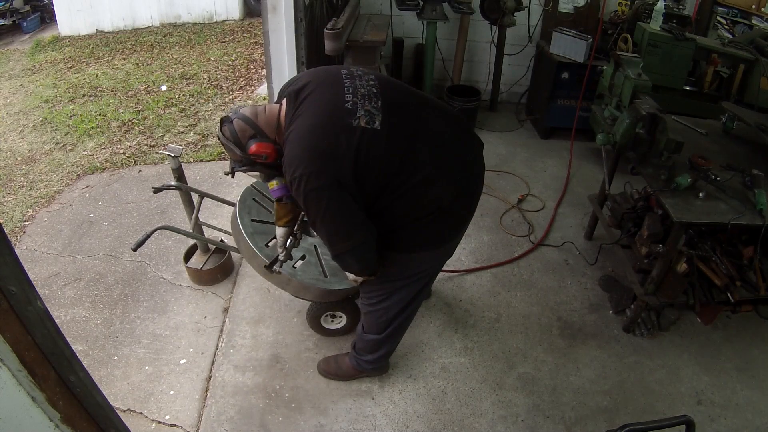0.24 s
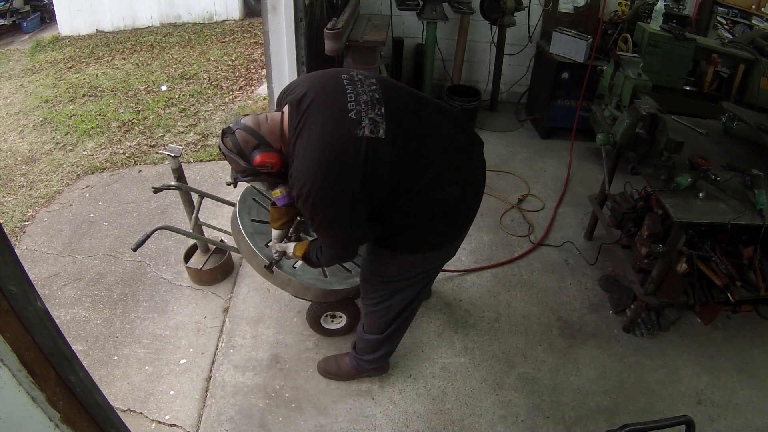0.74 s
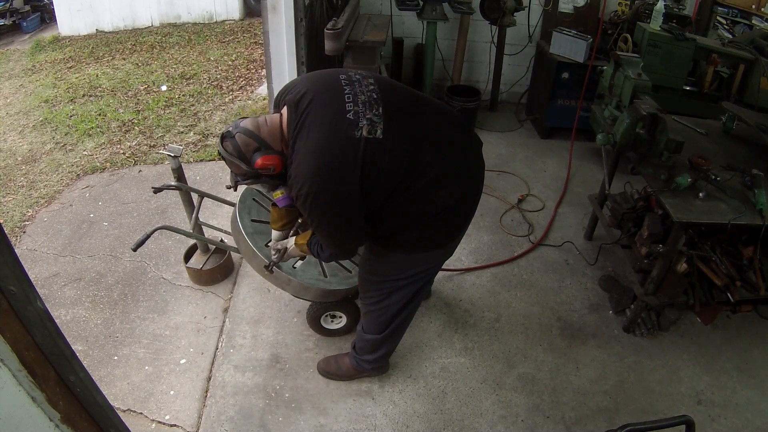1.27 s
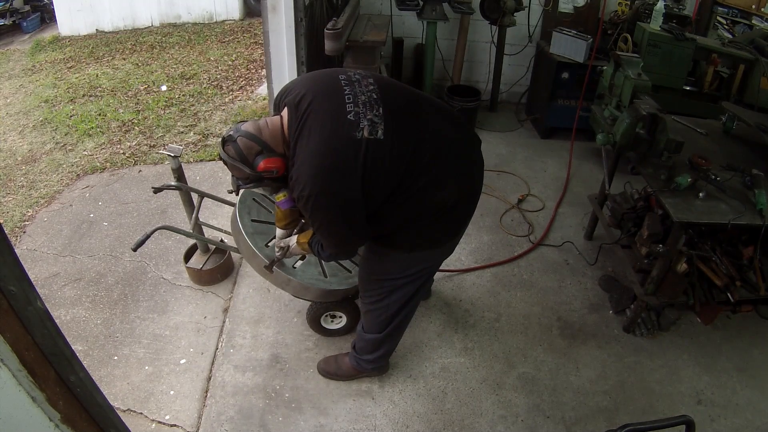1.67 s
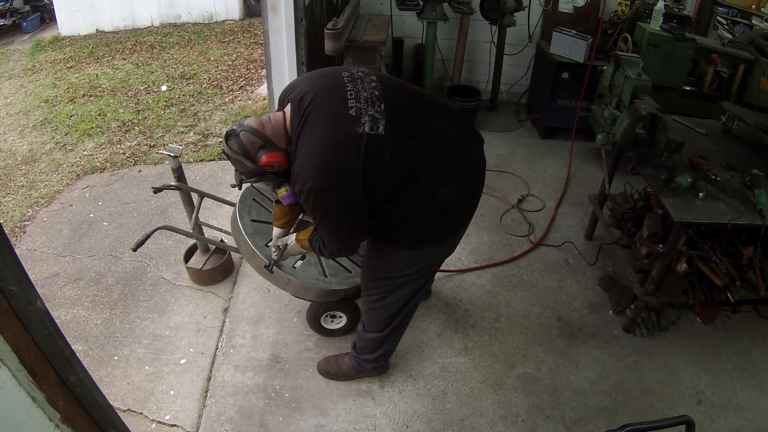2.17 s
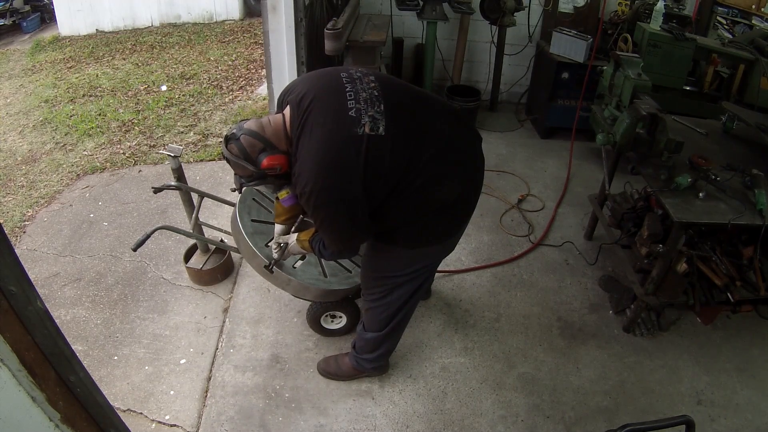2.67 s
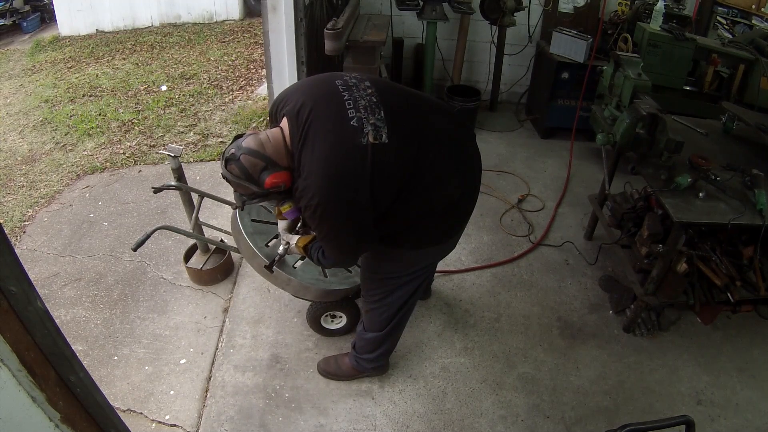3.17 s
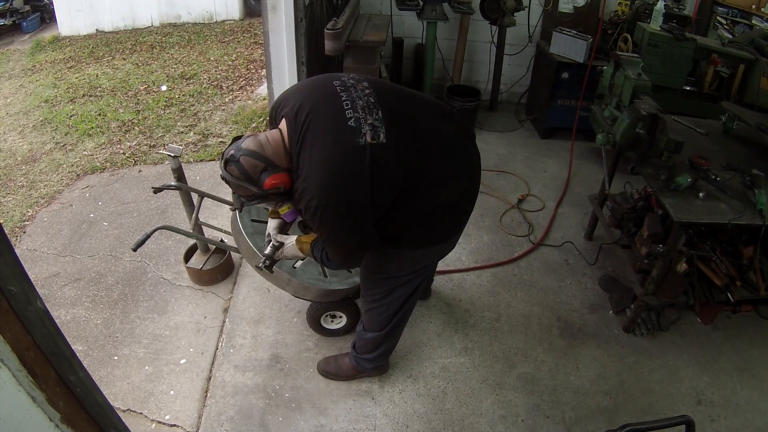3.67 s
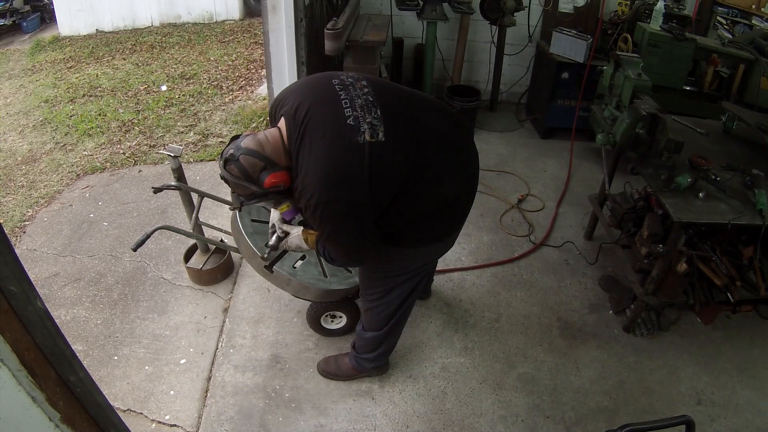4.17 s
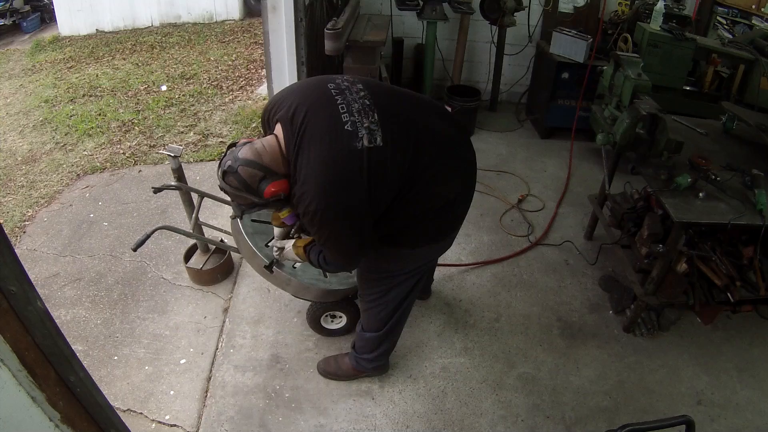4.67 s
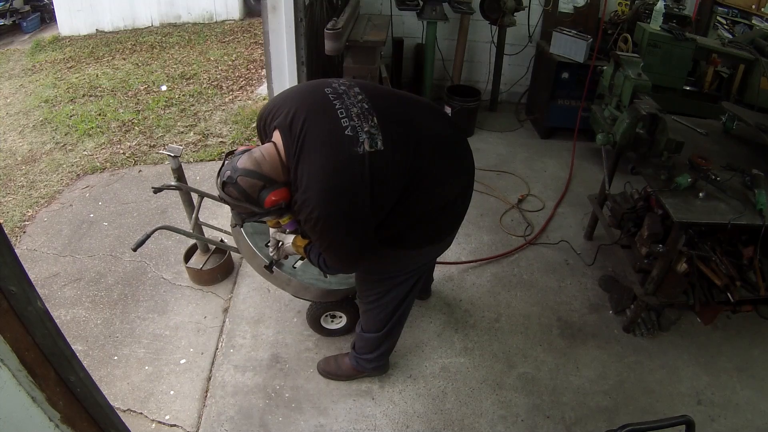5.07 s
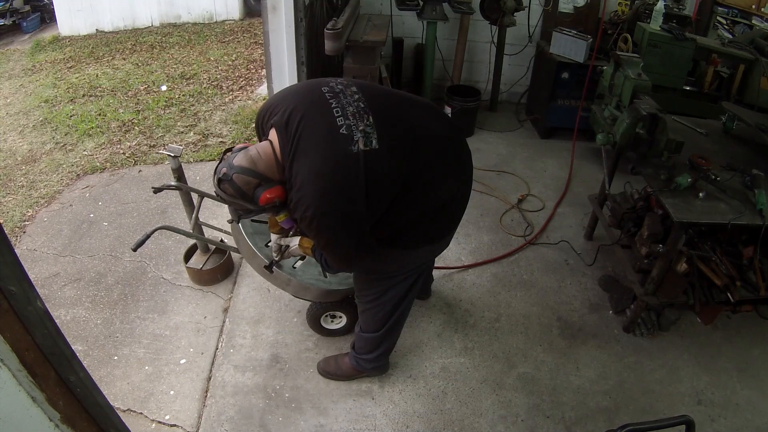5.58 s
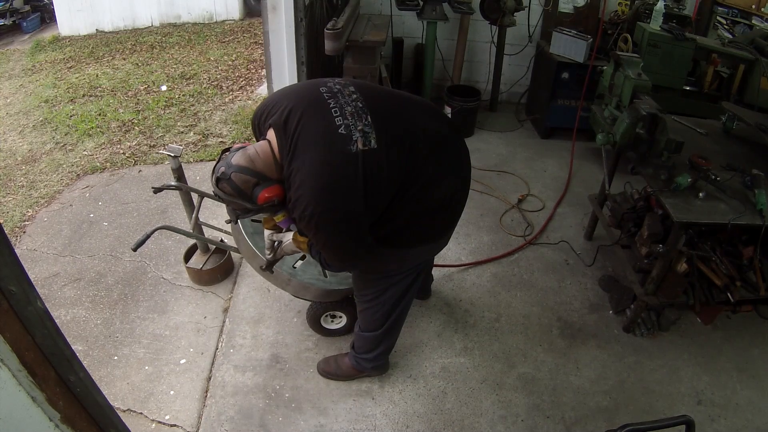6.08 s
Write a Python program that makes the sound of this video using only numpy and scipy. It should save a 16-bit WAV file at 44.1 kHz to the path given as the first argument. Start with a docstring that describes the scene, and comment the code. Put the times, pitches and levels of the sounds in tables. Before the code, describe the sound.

An air grinder with a wire wheel whines and hisses against rusty iron, stops for three seconds over a fan's hum, then restarts.

```python
"""Air grinder on rusty iron

A four-vane air grinder scours cast iron with a wire wheel at the open door of a workshop. Air puffs from
the vanes whine and hiss, the wires scratch and squeal, and the pitch sags under hand pressure. The
throttle is let go, the wheel stalls against the work, and three seconds later it spins up again.
A shop fan and mains hum fill the pause."""
import sys
import numpy as np
from scipy import signal
from scipy.fft import rfft, irfft, next_fast_len
from scipy.io import wavfile
from scipy.ndimage import uniform_filter1d, map_coordinates

SR = 44100
rng = np.random.default_rng(int(sys.argv[2]) if len(sys.argv) > 2 else 0)


def transcribe(signal):
    """Save signal, clipped to [-1, 1], as a 16-bit WAV file at the path in sys.argv[1]."""
    frames = np.atleast_2d(signal).T
    limited = np.clip(frames, -1, 1)
    pcm = np.round(limited * 32767).astype(np.int16)
    wavfile.write(sys.argv[1], SR, pcm)


N = 279153
TIME = np.arange(N) / SR
RELEASE_AT_S, SHUT_S, SQUEEZE_AT_S, OPEN_S = 2.542, 0.031, 5.594, 0.028   # the throttle valve
STALL_AT_S, STALL_S, START_AT_S, RUN_UP_S = 2.536, .13, 5.622, .135   # the wheel


def from_db(db):
    """Decibels to gain."""
    return 10 ** (np.asarray(db) / 20)


def rms_one(x):
    """Scale to unit power."""
    return x / np.sqrt(np.mean(x ** 2) + 1e-20)


def ramp(start_s, length_s):
    """Rise evenly from zero to one."""
    return np.clip((TIME - start_s) / length_s, 0, 1)


def in_time(rows):
    """Each column of an automation curve at every sample."""
    times, *columns = np.transpose(rows)
    return [np.interp(TIME, times, column) for column in columns]


def at_hz(points, hz):
    """Read a table on a log-frequency axis."""
    table = np.array(points)
    return np.interp(np.log(hz + 1), np.log(table[:, 0]), table[:, 1])


def colour(x, spectrum):
    """Shape a sound with an EQ curve; unit power."""
    size = next_fast_len(N)
    gains = from_db(at_hz(spectrum, np.fft.rfftfreq(size, 1 / SR)))
    return rms_one(irfft(rfft(x, size) * gains, size)[:N])


def high_pass(x, hz):
    """Take out the bass, steeply."""
    return signal.sosfilt(signal.butter(4, hz, "high", fs=SR, output="sos"), x)


def drift(rate_hz):
    """Smooth random wander with a spread of one."""
    pole = np.exp(-80 * np.pi * rate_hz / SR)
    noise = rng.standard_normal(N // 40 + 2002)
    slow = signal.lfilter([1], [1, -2 * pole, pole * pole], noise)[2000:]
    return np.interp(np.arange(N) / 40, np.arange(len(slow)), rms_one(slow))


def ring(force, hz, t60):
    """One mode: a unit click starts a decaying sine of height one."""
    decay, angle = from_db(-60 / (t60 * SR)), 2 * np.pi * hz / SR
    return signal.lfilter([0, np.sin(angle)], [1, -2 * decay * np.cos(angle), decay ** 2], force + 1e-18)


def clicks(per_s, spread_db):
    """Random impacts of uneven strength and sign."""
    sizes = from_db(spread_db * np.clip(rng.standard_normal(N), -2, 2)) * rng.choice([-1, 1], N)
    return sizes * (rng.random(N) < per_s / SR)


def turn_pattern(turns, wear_turns, size=256):
    """Fine texture that comes back on every turn and slowly changes."""
    pattern = rng.standard_normal((N // 100, size))
    pattern = signal.lfilter([1], [1, -np.exp(-1 / wear_turns)], pattern, axis=0)[100:]
    return rms_one(map_coordinates(pattern.ravel(), [turns * size], order=1, mode="wrap"))


def tones(orders, turns, shake, flutter_db):
    """Multiples of the turning rate; a shake of the rotor smears the high ones most."""
    out = np.zeros(N)
    for order, level_db in orders:
        gain = from_db(level_db + flutter_db * drift(9.9))
        out += gain * np.sin(2 * np.pi * (round(order) * (turns + shake) + rng.random()))
    return out


# Decay of the workshop reverb: frequency_hz, t60_s
ROOM_DECAY = [(100, 0.34), (800, 0.41), (4000, 0.45), (15000, 0.17)]
def workshop(x, wet_db, gap_s):
    """Direct sound and a diffuse tail whose treble dies first."""
    t = TIME[:SR]
    edges = np.geomspace(100, 16000, 9)
    tail = np.zeros(SR)
    for low, high in zip(edges, edges[1:]):
        band_pass = signal.butter(2, [low, high], "band", fs=SR, output="sos")
        band = signal.sosfilt(band_pass, rng.standard_normal(SR))
        tail += band * from_db(-60 * t / at_hz(ROOM_DECAY, np.sqrt(low * high)))
    tail *= np.clip(t / gap_s - 1, 0, 1)
    return x + from_db(wet_db) * signal.fftconvolve(x, tail / np.linalg.norm(tail))[:N]


# EQ of the fan's airy bed: frequency_hz, gain_db
FAN_EQ = [(25, -18), (42, -16), (58, -16), (75, -26), (97, 0), (125, -9), (190, -12.5), (400, -6.5),
          (700, -2), (1130, 0.5), (1650, -8), (5200, -21), (7500, -34.5), (15500, -41.5)]
# Mains hum and fan tones: pitch_hz, level_db
HUM_TONES = [(60, -62.5), (119.8, -51), (240, -60.5), (300.5, -46), (340.5, -64), (454, -62.5),
             (515, -57.5), (570, -50.5), (682.6, -50), (1135, -51.5)]
def shop_fan(air_db, hum_db, waver_db):
    """Steady rush of air with slightly wavering tones."""
    air = colour(rng.standard_normal(N), FAN_EQ) * from_db(air_db + 0.67 * drift(1.9))
    hum = np.zeros(N)
    for hz, level_db in HUM_TONES:
        gain = from_db(level_db + waver_db * drift(4.9))
        hum += gain * np.sin(2 * np.pi * hz * TIME + 0.7 * drift(2.3))
    return air + from_db(hum_db) * hum


# Soft brushes in the pause: peak_s, half_width_s, level_db
WHEEL_SCUFFS = [(3.335, .008, -65), (3.405, .005, -59), (3.42, .05, -67), (4.44, .006, -62)]
def scuffs(hz):
    """Wires flick over the casting as the still wheel is shifted."""
    swell = sum(from_db(level_db) * np.exp(-((TIME - peak_s) / half_width_s) ** 2)
                for peak_s, half_width_s, level_db in WHEEL_SCUFFS)
    return swell * rms_one(ring(clicks(3000, spread_db=4), hz, t60=.002))


def hose_kick(vane_hz, hz, t60, level_db):
    """The hose jerks when the rotor breaks free and the air starts to flow."""
    flowing = np.clip(vane_hz / 150, 0, 1)
    surge = np.maximum(np.diff(flowing, prepend=flowing[0]), 0)
    thump = high_pass(ring(surge, hz, t60), hz=65.05)
    return from_db(level_db) * thump / (np.abs(thump).max() + 1e-12)


# Ring of the iron: pitch_hz, level_db, t60_s
IRON_MODES = [(581, 0.5, 0.052), (814, 4, 0.087), (954, -1.5, 0.19), (1506, -8, 0.26), (1750, -12, 0.27),
              (3195, -19, .15), (3990, -19, 0.27)]
# Knocks as the wheel catches on stopping and starting: start_s, level_db
WHEEL_CATCHES = [(2.571, -10), (2.588, -3.5), (2.597, -11), (2.622, -28), (2.65, -16.5), (5.631, -16),
                 (5.638, -9), (5.647, -19)]
def casting(scratch, scratch_db, catch_db, crack_db, crack_s):
    """Scratching keeps the iron ringing; each catch of the wheel strikes it with a short, dull crack."""
    knocks = np.zeros(N)
    for start_s, level_db in WHEEL_CATCHES:
        knocks[round(start_s * SR)] = from_db(level_db)
    force = from_db(scratch_db) * scratch + from_db(catch_db) * knocks
    modes = sum(from_db(level_db) * ring(force, hz, t60) * (-1) ** k
                for k, (hz, level_db, t60) in enumerate(IRON_MODES))
    grit = colour(rng.standard_normal(N), [(300, 10), (900, 6), (1900, -1.5), (4000, -11), (15000, -41)])
    crack = signal.lfilter([1], [1, -np.exp(-1 / (crack_s * SR))], knocks + 1e-18) * grit
    return high_pass(modes + from_db(crack_db) * crack, hz=340)


# Buzzy resonances of the ribs: pitch_hz, level_db, t60_s
RIB_MODES = [(2450, -24, 0.02), (3074, 5.5, 0.012), (3223, 2, 0.018)]
def rib_rasp(strikes, load):
    """The casting's ribs buzz under the wires, louder with hand pressure."""
    buzz = sum(from_db(level_db) * ring(strikes, hz, t60) for hz, level_db, t60 in RIB_MODES)
    return from_db(-51.5 + 20.6 * load) * rms_one(buzz)


# Brief, thin squeals: start_s, end_s, pitch_hz, level_db
WIRE_SQUEALS = [(0.049, 0.197, 10710, -28), (.2, 0.423, 10440, -33), (0.41, 0.679, 10440, -32),
                (.76, 1.12, 9640, -37), (1.519, 1.85, 11900, -34), (1.849, 2.309, 10930, -30.5),
                (2.081, 2.519, 9490, -35), (5.98, 6.14, 10630, -43)]
def squeals(t60):
    """Wire tips stick and slip in a narrow, rough whistle."""
    out = np.zeros(N)
    for start_s, end_s, hz, level_db in WIRE_SQUEALS:
        swell = np.clip(np.minimum(TIME - start_s, end_s - TIME) / 0.029, 0, 1)
        out += from_db(level_db) * swell * rms_one(ring(rng.standard_normal(N), hz, t60))
    return out


# Bright EQ of wire tips on iron: frequency_hz, gain_db
WIRE_EQ = [(200, -36), (500, -16), (1500, -2.5), (2400, -1.5), (3200, -9.5), (3800, -14.5), (4700, 6.5),
           (6400, 6.5), (8700, -4), (9200, 5), (10600, 7.5), (12800, 3), (15500, -5.5)]
def wire_wheel(turns, repeat_share, strikes_per_s, tuft_db):
    """The same wires strike on every turn, slowly bending into a new pattern; rust adds random hits."""
    bite = from_db(tuft_db * np.cos(2 * np.pi * turns) + drift(67))   # lopsided: hardest once a turn
    wires = np.sqrt(repeat_share) * turn_pattern(turns, wear_turns=18.0)
    rust = np.sqrt(1 - repeat_share) * rms_one(clicks(strikes_per_s, spread_db=1.0))
    return colour(high_pass((wires + rust) * bite, hz=180), WIRE_EQ)


# EQ of the exhaust hiss: frequency_hz, gain_db
JET_EQ = [(150, -36), (400, -36), (750, -21), (1100, -15.5), (1900, -10), (3100, -9.5), (4050, -11),
          (4500, -5), (4900, -1), (5300, -3), (5750, -9.5), (6600, -13.5), (8500, -16.5), (11000, -16.5),
          (15500, -19)]
def exhaust(turns, spin, pulsing, repeat_share):
    """The jet hisses harder on every vane puff; at speed part of it screams in step with the rotor."""
    share = repeat_share * spin ** 2
    scream = np.sqrt(share) * turn_pattern(turns, wear_turns=15.0)
    hiss = np.sqrt(1 - share) * rng.standard_normal(N)
    return colour((scream + hiss) * np.exp(pulsing * np.cos(8 * np.pi * turns)), JET_EQ)


def port_whistle(turns, hz, t60, level_db):
    """The fourth and fifth harmonics of the puffs sing as they cross the exhaust port's resonance."""
    overtones = tones([(16, 0), (20, -2)], turns, .002 * drift(120), flutter_db=2.5)
    return from_db(level_db) * rms_one(ring(overtones, hz, t60))


def chug(turns, vane_hz, slow_hz, rough):
    """A slow motor lets out separate, uneven puffs; at speed they melt into the whine."""
    puffs = np.maximum(np.cos(8 * np.pi * turns), 0) ** 2 * (1 + rough * drift(240))
    slowness = np.clip(3 * (1 - vane_hz / slow_hz), 0, 1) * np.clip(vane_hz / 700, 0, 1)
    for edge_hz, kind in ((503, "high"), (285, "high"), (1700, "low")):
        puffs = signal.sosfilt(signal.butter(2, edge_hz, kind, fs=SR, output="sos"), puffs)
    return puffs * slowness


# Throb of the unequal vanes: cycles_per_turn, level_db
THROB_TONES = [(1, -9.5), (2, 1), (3, -5.5), (5, -11.5), (6, -4)]
# Overtones that give the puffs their edge: cycles_per_turn, level_db
BITE_TONES = [(8, -1), (10, -19.5), (11, -10), (12, -12.5), (15, -11.5), (16, -11), (17, -10)]
def whine(turns, vane_hz, throttle, load, whine_db, throb_db, shake_turns, shudder, waver_db):
    """Four puffs a turn give the main tone and its overtones; unequal vanes add the other multiples."""
    labouring = np.clip((1290 - vane_hz) / 350, .2, 1)   # a slow or loaded rotor runs roughly
    shake = shake_turns * labouring * drift(100)
    # the first puffs of the restart get the full pressure of the hose
    surge_db = 11 * np.exp(-((TIME - START_AT_S - 0.023) / 0.015) ** 2)
    main = from_db(whine_db + surge_db + waver_db * drift(18.4)) * np.sin(8 * np.pi * (turns + shake))
    main *= 1 + shudder * labouring * drift(83)
    throb = from_db(throb_db) * tones(THROB_TONES, turns, shake, flutter_db=2.0)
    bite = tones(BITE_TONES, turns, shake + 0.0044 * drift(120), flutter_db=3.0)
    bite *= from_db(-28.5 + 3.1 * load)
    # overtones need pressure and speed; after the run-up they grow back in
    speed = np.clip(vane_hz / 1100, 0, 1)
    regrowth = ramp(START_AT_S + RUN_UP_S, length_s=0.12)
    settled = np.where(TIME < START_AT_S, speed ** 3 * np.maximum(throttle, .35), regrowth)
    return main + throb * speed * np.maximum(throttle, .2) + bite * settled


# Pitch curve of the vane puffs in each burst: time_s, pitch_hz
FIRST_PITCH = [(0.0, 1165), (0.07, 1275), (0.13, 1320), (0.42, 1256), (0.48, 1298), (0.55, 1304),
               (0.75, 1183), (0.92, 1218), (1.08, 1186), (1.16, 1140), (1.23, 1137), (1.3, 1230),
               (1.41, 1158), (1.5, 1195), (1.61, 1114), (1.72, 1150), (1.76, 1161), (1.91, 1098),
               (1.94, 1158), (2.07, 1151), (2.12, 1184), (2.23, 1145), (2.38, 1185), (2.53, 1168)]
SECOND_PITCH = [(5.77, 1082), (5.818, 1088), (5.85, 1039), (5.89, 1174), (6.024, 1329), (6.162, 1320),
                (6.216, 1118), (6.27, 1243)]
def rotor(free_hz, full_sag_hz, wobble):
    """Vane rate and load: pressure drags the speed down; the rotor stalls, then runs up again."""
    working_hz, = in_time(list(FIRST_PITCH) + list(SECOND_PITCH))
    run_down = np.cos(np.pi / 2 * ramp(STALL_AT_S, STALL_S)) ** 2
    run_up = np.sin(np.pi / 2 * ramp(START_AT_S, RUN_UP_S))
    grip = 1 + wobble * drift(24.92)   # the grip of the wires shakes the speed
    load = np.clip((free_hz - working_hz) / full_sag_hz, 0, 1)
    return working_hz * (run_down + run_up) * grip, load


# Fader moves in each burst: time_s, whine_db, throb_db, exhaust_db, scratch_db
FIRST_FADERS = [(0.02, -13.5, -28, -21, -19.5), (0.17, -21, -28, -24, -25.5),
                (0.38, -16, -29.5, -23.5, -23.5), (0.56, -18, -26.5, -22, -21.5), (0.6, -14, -30, -22, -21),
                (0.98, -18, -27, -25.5, -24.5), (1.52, -15, -28, -23, -23.5),
                (1.69, -29.5, -31, -28, -26.5), (1.77, -13.5, -28.5, -23, -22.5),
                (1.84, -17, -27, -24, -22), (2.21, -13, -29, -20.5, -27),
                (2.26, -13.5, -24.5, -20.5, -23.5), (2.44, -11, -33, -27.5, -24.5),
                (2.53, -16.5, -26.5, -24, -24.5)]
SECOND_FADERS = [(5.66, -23, -17, -19, -23.5), (5.682, -16, -27, -22, -28), (5.736, -18.5, -27, -19, -32),
                 (5.796, -12, -27, -19, -31), (5.992, -17.5, -25.5, -21.5, -35),
                 (6.3, -15, -27.5, -23.5, -37)]
def grinder(vane_hz, load):
    """Speed and throttle drive motor, exhaust and wires together, all sounding in the workshop."""
    throttle = 1 - ramp(RELEASE_AT_S, SHUT_S) + ramp(SQUEEZE_AT_S, OPEN_S) ** 2
    whine_db, throb_db, exhaust_db, scratch_db = in_time(list(FIRST_FADERS) + list(SECOND_FADERS))
    turns = np.cumsum(vane_hz) / (4 * SR)
    spin = np.clip(vane_hz / 1000, 0, 1)

    # with the air shut off the tone fades quickly as the rotor slows
    drive = throttle * spin ** .3 + (1 - throttle) * 1.7 * spin ** 1.45
    motor = drive * whine(turns, vane_hz, throttle, load, whine_db - 0.5, throb_db - 1.0,
                          shake_turns=0.0088, shudder=0.29, waver_db=1.12)
    stumble = .026 * throttle * drift(166)   # under pressure, slow vanes seal unevenly
    motor += from_db(-4.5) * chug(turns + stumble, vane_hz, slow_hz=1150, rough=0.63)
    motor += throttle * port_whistle(turns, hz=5220, t60=.007, level_db=-33)
    motor = high_pass(motor, hz=247)   # the small port gives off little bass
    airflow = throttle * from_db(exhaust_db - 0.5 + 0.58 * drift(13.4))
    air = airflow * exhaust(turns, spin, pulsing=0.42, repeat_share=0.68)

    # the wires bear more lightly once the first grab of the restart is over
    lighter_db = -7.5 * ramp(START_AT_S + 0.071, length_s=0.071)
    pressure = np.maximum(throttle, .1) * spin ** .6 * from_db(lighter_db)
    strikes = pressure * wire_wheel(turns, repeat_share=0.25, strikes_per_s=6000, tuft_db=2.5)
    scratch = from_db(scratch_db - 0.5) * strikes
    rasp = throttle * rib_rasp(strikes, load)
    iron = casting(scratch, scratch_db=-53.0, catch_db=-14, crack_db=-8, crack_s=0.0039)

    motor_in_room = workshop(motor, wet_db=-6.5, gap_s=0.0097)
    scouring = air + scratch + rasp + iron + squeals(t60=0.0076)
    return motor_in_room + workshop(scouring, wet_db=-6.5, gap_s=0.006)


def scene():
    """The grinder up front over the fan and small handling sounds, the same in both channels."""
    vane_hz, load = rotor(free_hz=1330, full_sag_hz=170, wobble=.003)
    mono = from_db(8.5) * grinder(vane_hz, load) + shop_fan(air_db=-35.0, hum_db=2.0, waver_db=2.0)
    mono += scuffs(hz=9700) + hose_kick(vane_hz, hz=86.84, t60=.22, level_db=-29.5)
    return np.array([mono, mono])


def gain_control(x, threshold_db, slope, release_db_per_s):
    """Loud sound turns the gain down quickly; it creeps back afterwards."""
    level_db = 10 * np.log10(np.maximum(uniform_filter1d(x[0] ** 2, size=600), 1e-12))
    cut_db = slope * np.maximum(level_db - threshold_db, 0)
    held_db = np.maximum.accumulate(cut_db + release_db_per_s * TIME) - release_db_per_s * TIME
    smooth = np.exp(-1 / (0.022 * SR))
    eased_db, _ = signal.lfilter([1 - smooth], [1, -smooth], held_db, zi=[held_db[0]])
    return x * from_db(-eased_db)


def record(dry):
    """Gain control, rounded peaks and a steep top cut."""
    levelled = gain_control(dry, threshold_db=-23, slope=0.45, release_db_per_s=15.5)
    rounded = 2 * np.tanh(levelled / 2)
    return signal.sosfilt(signal.ellip(12, .1, 80, 15350, fs=SR, output="sos"), rounded)


dry = scene()
out = record(dry)
transcribe(out)
```